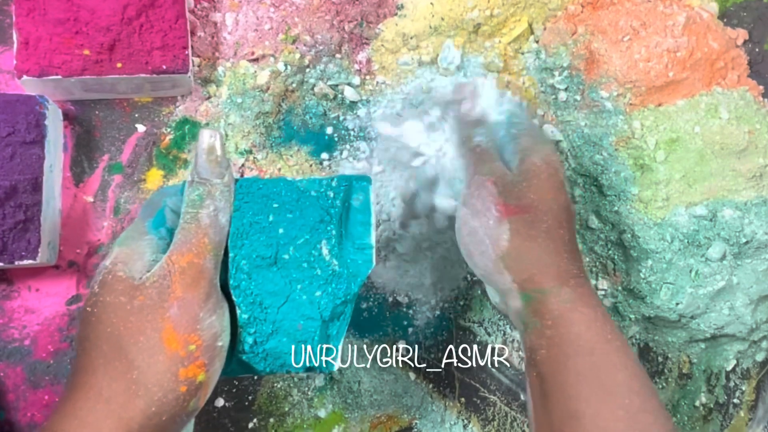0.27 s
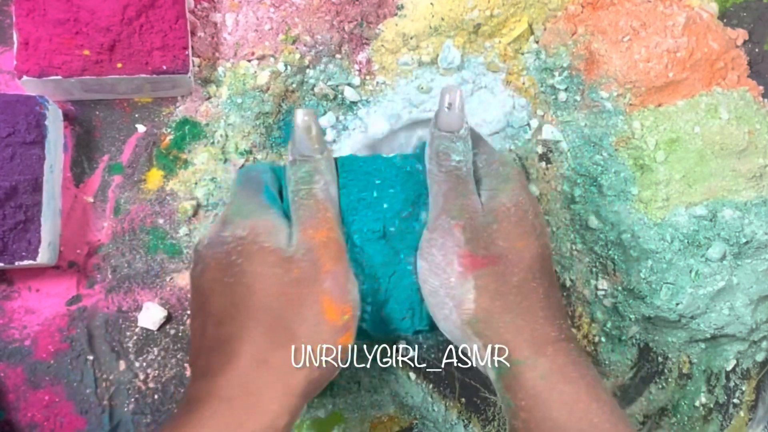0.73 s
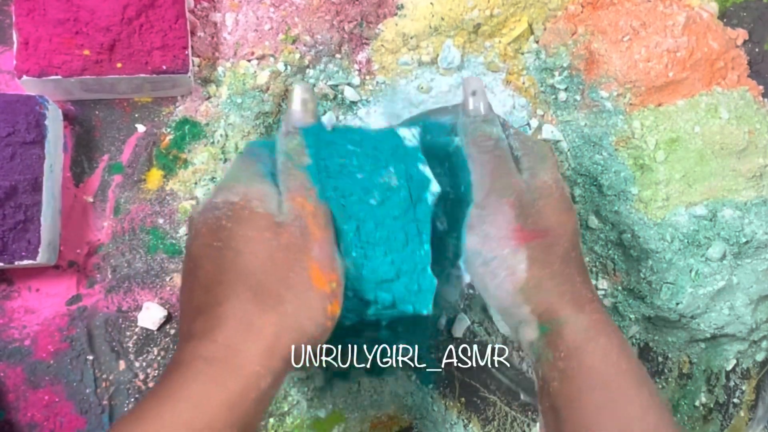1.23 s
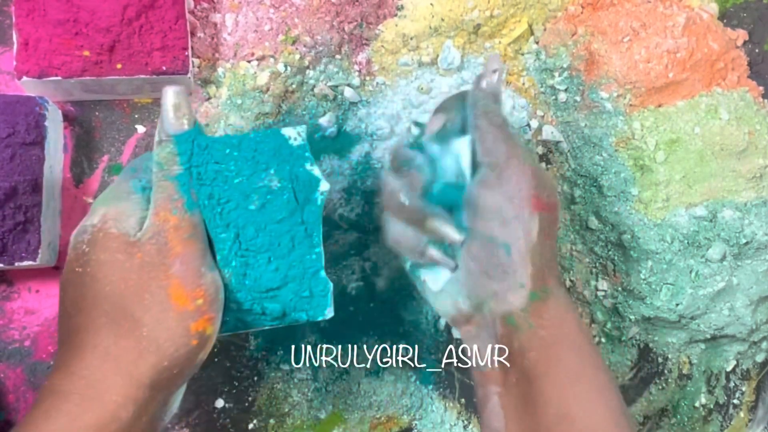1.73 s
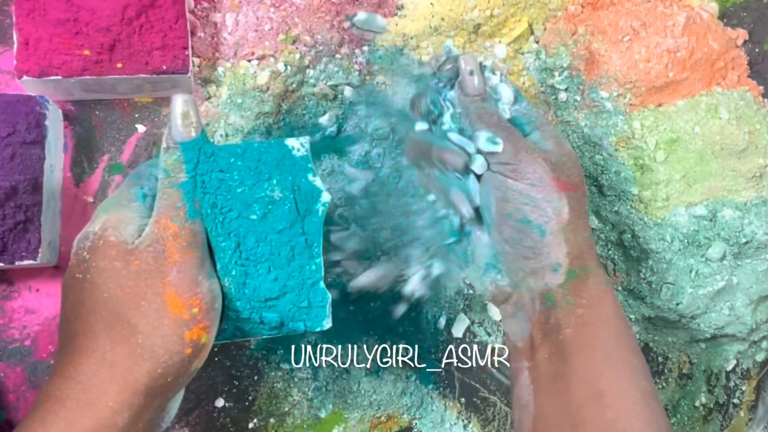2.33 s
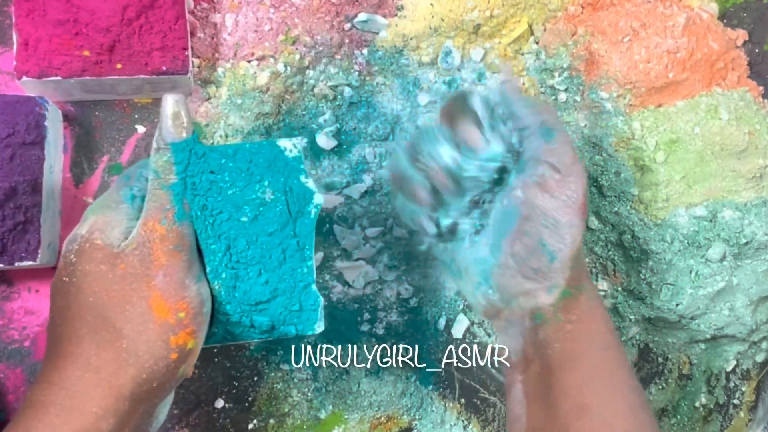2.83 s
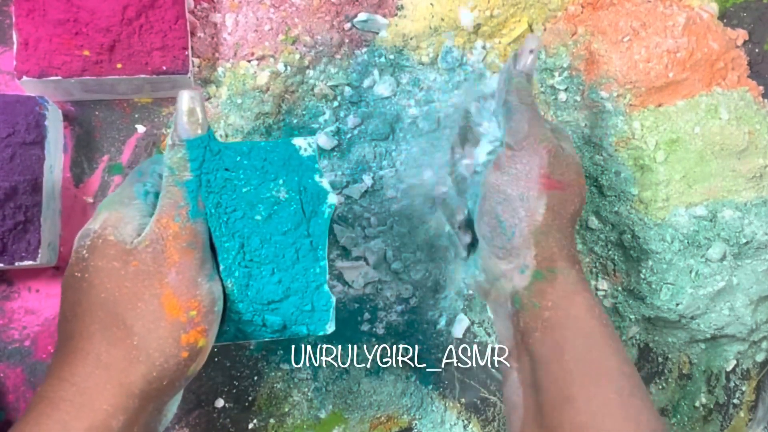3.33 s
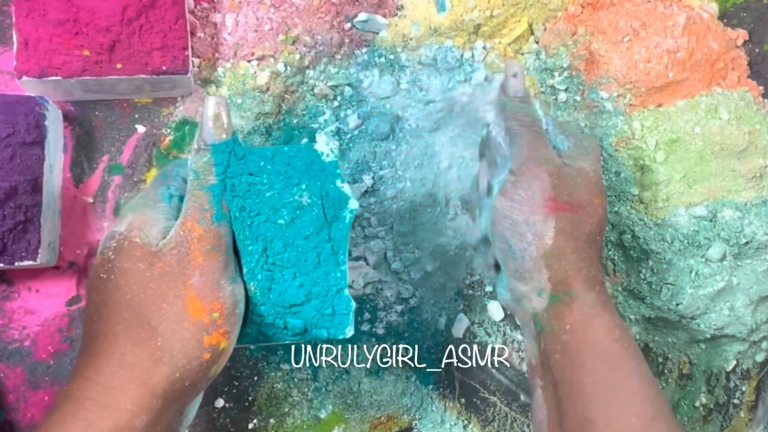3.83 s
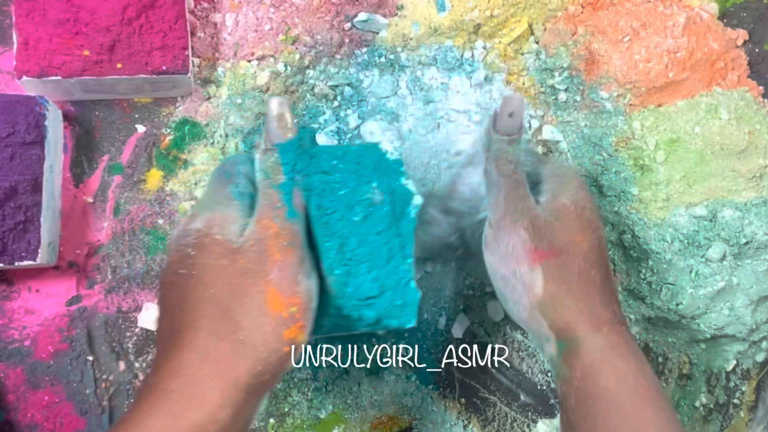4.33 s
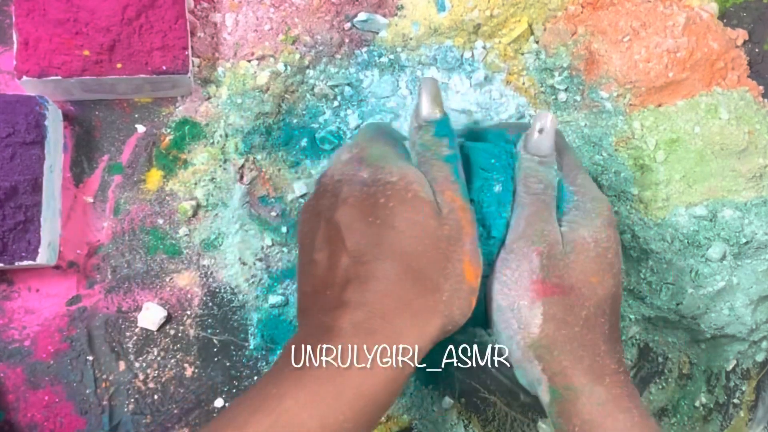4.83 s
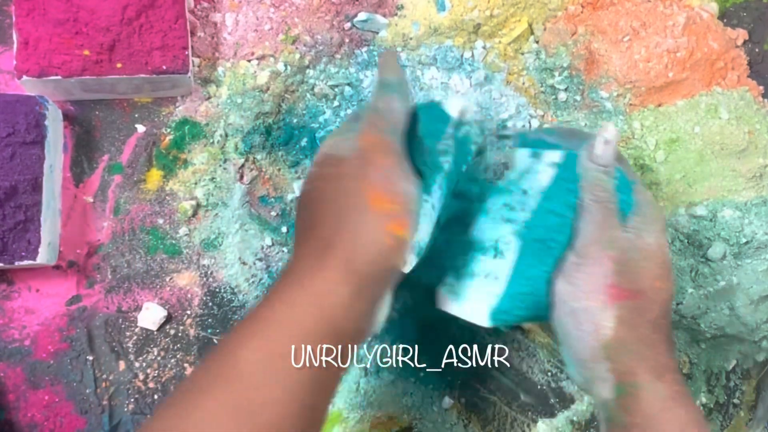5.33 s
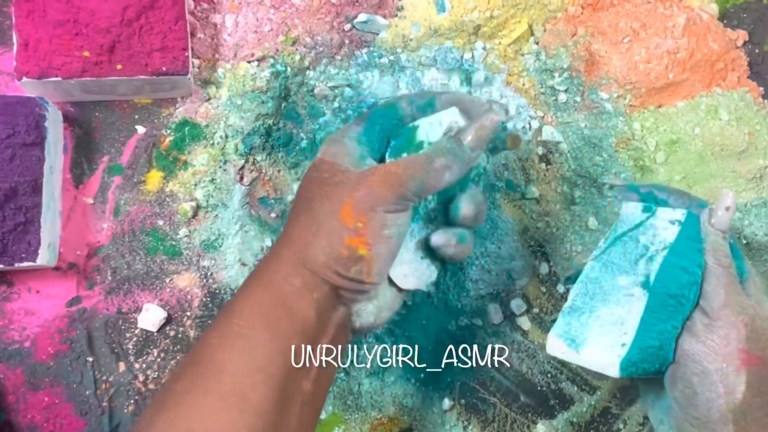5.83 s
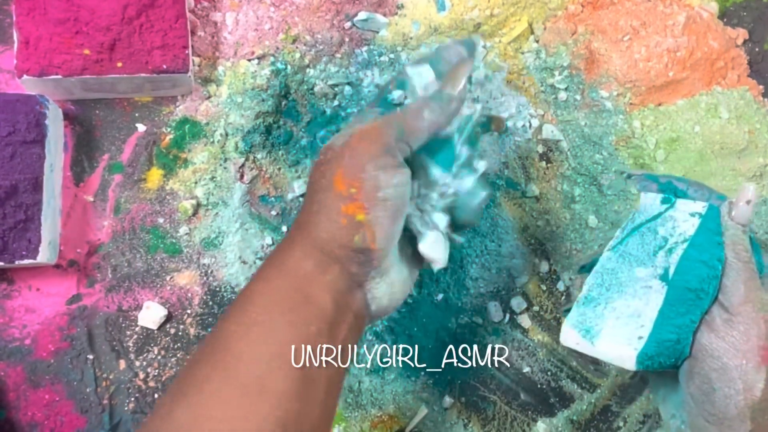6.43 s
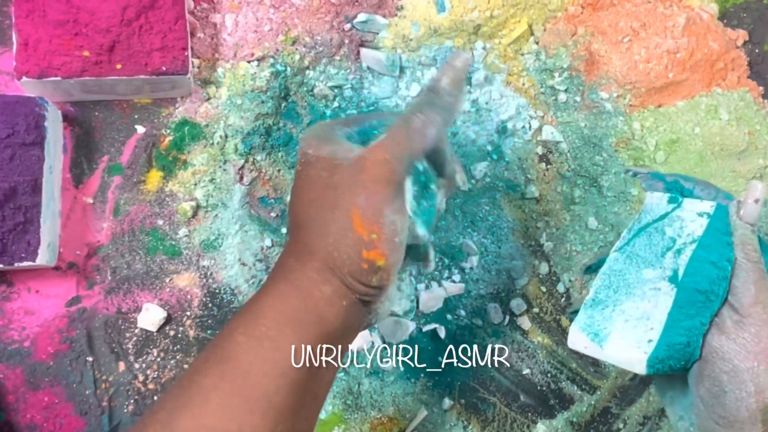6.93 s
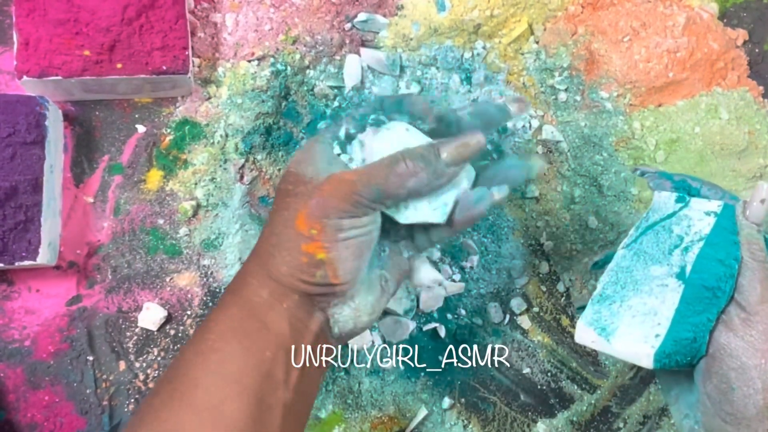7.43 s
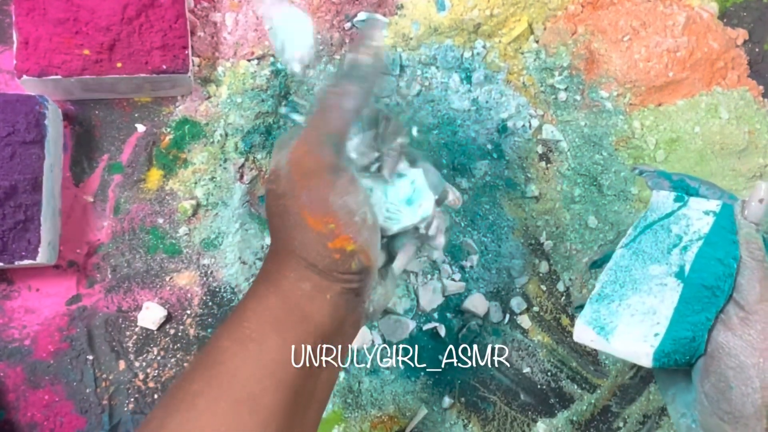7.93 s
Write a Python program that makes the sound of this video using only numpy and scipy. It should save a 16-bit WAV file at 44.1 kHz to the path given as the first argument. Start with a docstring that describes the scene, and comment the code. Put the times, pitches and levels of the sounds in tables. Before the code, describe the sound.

Hands crush blocks of soft chalk up close, with sharp cracks and gritty crumbling over a faint room hum.

```python
"""At a table strewn with powder, hands crush blocks of soft chalk close under a two-port phone microphone.
Each crack is a short avalanche of tiny fractures that sprays splinters, rings a loose chip, knocks in
the block and thuds in the table top. Between the cracks dust and crumbs trickle and chalk faces swish
over each other. Behind it all lies a room rumble with a thin fan hiss and mains hum."""
import sys
import numpy as np
from scipy import signal
from scipy.fft import rfft, irfft, next_fast_len
from scipy.io import wavfile
from scipy.ndimage import uniform_filter1d

SR = 44100
rng = np.random.default_rng(int(sys.argv[2]) if len(sys.argv) > 2 else 0)


def store_wav(level_fs):
    """Save 16-bit WAV to argv[1]."""
    pcm = np.round(np.clip(np.atleast_2d(level_fs), -1, 1) * 32767)
    wavfile.write(sys.argv[1], SR, pcm.T.astype(np.int16))


N = 360738


def undb(db):
    return 10 ** (np.asarray(db, float) / 20)


def curve(rows):
    """Automation lanes: each column after the time, ramped from row to row."""
    times, *columns = np.transpose(rows)
    return [np.interp(np.arange(N) / SR, times, column) for column in columns]


def flicker(rate):
    """Smooth random wobble with rate new values a second; spread near 1."""
    hold = int(SR / rate)
    steps = np.repeat(rng.standard_normal(N // hold + 1), hold)
    return 1.5 * uniform_filter1d(uniform_filter1d(steps, hold), hold)[:N]


def band(x, hz, width):
    """Four-pole band-pass around hz."""
    edges = [hz - width / 2, hz + width / 2]
    return signal.sosfilt(signal.butter(2, edges, "bandpass", fs=SR, output="sos"), x)


def body(x, peaks):
    """Colour x with broad resonances; white noise keeps roughly its level."""
    scale = np.sqrt(sum(undb(2 * db) * width for _, width, db in peaks) / (SR / 2))
    return sum((-1) ** k * undb(db) * band(x, hz, width)
               for k, (hz, width, db) in enumerate(peaks)) / scale


def mode(push, hz, t60):
    """One damped resonance, unity gain for noise."""
    radius = np.exp(-np.log(1000) / (t60 * SR))
    pole = radius * np.exp(2j * np.pi * hz / SR)
    return np.sqrt(2 - 2 * radius ** 2) * signal.lfilter([1], [1, -pole], push).imag


def smear(x, seconds):
    """Give every spike an exponential tail."""
    return signal.lfilter([1], [1, -np.exp(-1 / (seconds * SR))], x)


def grit(spread_db, smear_s):
    """Two noise streams with shared grain sizes: most are tiny, a few stand out; rms 1."""
    size = undb(spread_db * np.minimum(rng.exponential(size=N), 5.5))
    grains = np.sqrt(smear(size ** 2, smear_s)) * rng.standard_normal((2, N))
    return grains / np.sqrt(np.mean(grains ** 2))


# Air-handling rumble bands: f/Hz, width/Hz, level/dB
RUMBLE_BANDS = [(38.2, 4.3, -53.5), (60, 32.4, -48), (68, 23, -51), (119.8, 11.3, -50), (295.6, 22, -67.5)]
# Level of the narrow hiss as the phone's noise suppressor ducks and releases it: t/s, level/dB
HISS_LEVEL = [(0, -72), (1.12, -61), (1.27, -57), (3.7, -53), (4.0, -73), (5.15, -55.5), (5.25, -55),
              (5.75, -65), (6.8, -59.5), (6.9, -75.5), (7.06, -80), (7.12, -56.5), (7.9, -70)]
# Mains hum tones: f/Hz, level/dB
HUM_TONES = [(59.5, -58), (120, -53)]
def room():
    """The bed: low air-handling rumble, a narrow fan hiss and gently wavering mains hum."""
    def air(hz, width, db):
        return undb(db) * np.sqrt(SR / 2 / width) * band(rng.standard_normal((2, N)), hz, width)

    out = sum(air(*row) for row in RUMBLE_BANDS)
    out += air(hz=1540, width=150, db=curve(HISS_LEVEL)[0])
    t = np.arange(N) / SR
    for hz, db in HUM_TONES:
        out[0] += undb(db + 3 * flicker(1.8)) * np.sqrt(2) * np.sin(2 * np.pi * hz * t)
    return out


# Table-top modes: f/Hz, gain/dB, t60/s
TABLE_MODES = [(135.9, -9.5, 0.093), (208, -22, 0.018), (305.7, -16, 0.045), (412, -14, 0.017)]
def table_top(push):
    """The table top answers a push with a few low, damped modes."""
    ring = sum(undb(db) * mode(push, hz, t60) for hz, db, t60 in TABLE_MODES)
    return signal.sosfilt(signal.butter(2, 90, "highpass", fs=SR, output="sos"), ring)


# Sliding strokes: t/s, length/s, level/dB
STROKES = [(0.368, 0.081, -42.5), (2.143, 0.092, -39), (2.314, 0.04, -43), (3.373, 0.048, -44),
           (3.59, 0.15, -42), (3.91, 0.044, -38.5), (4.629, 0.11, -41), (5.308, 0.044, -46),
           (5.452, 0.16, -35.5), (5.624, 0.06, -35), (6.328, 0.22, -45), (7.088, 0.045, -36),
           (7.219, 0.075, -41.5), (7.316, 0.044, -39), (7.612, 0.056, -36), (7.773, 0.033, -26.5)]
# Bright chalk sizzle, shared by strokes and splinters: f/Hz, width/Hz, gain/dB
SIZZLE_BANDS = [(5700, 2450, 5.5), (7480, 670, -2), (9000, 2070, 4.5), (11460, 1120, -13.5)]
# Coarse rasp of rubbing faces: f/Hz, width/Hz, gain/dB
RASP_BANDS = [(2086, 120, 5), (2850, 970, -4.5), (1420, 520, -3.5)]
def swishes():
    """Chalk faces and fingers slide over each other: a soft swell with a slower release."""
    power = np.zeros(N)
    for at, length, db in STROKES:
        progress = np.linspace(0, 1, int(length * SR))
        start = int(at * SR)
        power[start:start + len(progress)] += undb(2 * db) * np.sin(np.pi * progress ** 0.77) ** 2
    friction = grit(spread_db=4, smear_s=0.00061) * np.sqrt(power)
    return body(friction, SIZZLE_BANDS) + undb(-13.5) * body(friction, RASP_BANDS)


def landings(per_second=70, spread_db=5):
    """Single crumbs land on the heap, each a short dry tick."""
    hits = (rng.random(N) < per_second / SR) * undb(spread_db * rng.standard_normal(N))
    return smear(hits, 0.0055) * rng.standard_normal((2, N))


# The hand working the chalk: t/s, dust level/dB, crumb level/dB, pressure level/dB
HANDWORK = [(0.0, -32.5, -30, -21), (.17, -51.5, -57.5, -45), (.57, -50.5, -44.5, -37),
            (.78, -54, -51.5, -45), (1.0, -64, -67, -48), (1.2, -52, -54, -36), (1.8, -49, -53, -45.5),
            (2.15, -52.5, -55, -56), (2.38, -41, -47.5, -61.5), (2.62, -47.5, -49.5, -35.5),
            (2.9, -51, -54, -43), (3.08, -42, -49.5, -42.5), (3.35, -57.5, -58, -41),
            (3.72, -43, -46.5, -43.5), (3.97, -52.5, -59, -51.5), (4.44, -51, -50, -39),
            (4.75, -53.5, -58.5, -48.5), (4.92, -55, -56.5, -37), (5.0, -59.5, -57, -39),
            (5.44, -55.5, -68.5, -43), (6.17, -49, -52.5, -56), (6.29, -59.5, -58, -65),
            (6.4, -51, -60, -55), (6.67, -39, -44, -33.5), (6.88, -57.5, -61, -45),
            (7.01, -58.5, -75.5, -63), (7.06, -47.5, -61, -48), (7.24, -47.5, -58.5, -45),
            (7.7, -44, -54, -41.5), (7.96, -57, -71, -61), (8.18, -46, -55, -31.5)]
# Hiss of fine dust: f/Hz, width/Hz, gain/dB
DUST_BANDS = [(3920, 2540, 3), (7350, 4300, 1), (9250, 3800, 2.5), (12000, 1200, -8)]
# Crunch of coarse crumbs: f/Hz, width/Hz, gain/dB
CRUMB_BANDS = [(688, 770, 4.5), (950, 400, 8), (1320, 286, 12.5), (2540, 1470, 5.5)]
def crumble():
    """Dust hisses, crumbs crunch and tick, faces swish and the pressing hand shakes the table."""
    dust_db, crumb_db, press_db = curve(HANDWORK)
    dust = grit(spread_db=3, smear_s=0.004) * undb(dust_db + 2.5 * flicker(45) + 0.5 * flicker(8))
    crumbs = grit(spread_db=7, smear_s=0.00081) * undb(crumb_db + 3.5 * flicker(35) + 1.3 * flicker(6.3))
    strokes = swishes()
    ticks = landings()
    hiss = body(dust + ticks * undb(dust_db - 6), DUST_BANDS)
    crunch = body(crumbs + ticks * undb(crumb_db), CRUMB_BANDS)
    pressure = rng.standard_normal((2, N)) * undb(press_db + 2 * flicker(21))
    return hiss + crunch + strokes + table_top(pressure)


def avalanche(times, levels_db, decays, tail_db, tail_t60, rise_s=0.0006):
    """Envelope of a row of breaks: strain creaks up, the break hits, a fainter tail crumbles on."""
    lead = SR // 20
    t = np.arange(-lead, SR // 4) / SR
    strain = undb(2 * -25) * np.exp(-2 * np.abs(t) / 0.003)  # 25 dB under the break, grows in 3 ms
    attack = np.clip(t / rise_s, 0, 1) ** 2
    after_peak = np.maximum(t - rise_s, 0)
    power = np.zeros(N + SR)
    for at, db, t60 in zip(times, levels_db, decays):
        release = undb(-120 * after_peak / t60) + undb(2 * tail_db - 120 * after_peak / tail_t60)
        start = int(at * SR)
        power[start:start + len(t)] += undb(2 * db) * (strain + attack * release)
    return np.sqrt(power[lead:N + lead])


def blows(times, levels_db, contact_s):
    """One push and rebound per blow; a shorter contact sounds brighter."""
    out = np.zeros(N + SR)
    for at, db, contact in np.broadcast(times, levels_db, contact_s):
        push = np.diff(np.hanning(int(contact * SR)))
        start = int(at * SR)
        out[start:start + len(push)] += undb(db) * push / np.sqrt(np.mean(push ** 2))
    return out[:N]


# Block, lump or fist coming down on the table: t/s, level/dB, t60/s, contact/s
THUD_CUES = [(0.495, -23, 0.18, 0.0022), (0.557, -22.5, 0.21, 0.0019), (1.047, -20, .06, 0.0047),
             (2.297, -29.5, 0.85, 0.0032), (2.331, -34, 0.19, 0.0052), (2.36, -25.5, 0.19, 0.0047),
             (2.389, -28.5, 0.16, 0.0056), (2.419, -39.5, 0.18, 0.0044), (2.691, -38.5, 0.089, 0.0039),
             (3.052, -38, 0.27, 0.013), (4.095, -36.5, 0.26, 0.0042), (4.493, -22.5, 0.13, 0.0012),
             (5.042, -6, 0.12, 0.0022), (6.183, -39.5, 0.25, 0.0013), (6.429, -31.5, 0.19, 0.0011),
             (6.624, -21.5, 0.17, 0.0031), (8.016, -34, 0.31, 0.0025), (8.097, -36, 0.099, 0.00071),
             (8.141, -43, .08, 0.0029)]
def thuds(fractures, crack_times, knock_db, crack_t60):
    """The table thuds under each blow and each crack; a harder knock shakes it more."""
    shake_db = -45.5 + 0.53 * (knock_db + 30)
    shakes = [crack_times, shake_db, 5.2 * crack_t60, np.full_like(crack_times, 0.0022)]
    times, db, t60, contact_s = np.hstack([shakes, np.transpose(THUD_CUES)])
    push = fractures * avalanche(times, db, t60, tail_db=-3, tail_t60=0.18)
    push[0] += blows(times, db - 5.5, contact_s)
    return table_top(push)


def chips(shatter, times, knock_db, pitches, decays):
    """Each freed chip rings, rattled by the shatter and struck once; bigger, lower chips ring louder."""
    out, length = np.zeros((2, N + SR)), SR // 16
    t = np.arange(length) / SR
    for at, db, hz, t60 in zip(times, knock_db, pitches, decays):
        start = int(at * SR)
        rattle = shatter[:, start:start + length]
        gate = t[:rattle.shape[1]] < t60 / 3
        out[:, start:start + len(gate)] += mode(rattle * gate, hz, t60=0.022)
        ring_t60 = 17 / np.sqrt(1000 * hz)  # 17 cycles at 1 kHz, fewer for lower chips
        strike = undb(db + 2.5 - 60 * t / ring_t60) * np.sqrt(1000 / hz)
        phase = 2 * np.pi * hz * t
        overtone = undb(-10.5) * np.sin(2.25 * phase)
        out[0, start:start + length] += strike * (np.sin(phase) + overtone)
    return undb(-6.5) * out[:, :N]


# Cracks and dropped lumps: t/s, shard level/dB, knock level/dB, splinter level/dB, chip f/Hz, t60/s
CRACK_CUES = [(0.018, -28, -49, -23, 860, 0.035), (0.072, -62, -26, -60.5, 804, 0.13),
              (0.247, -47, -26, -58, 740, 0.087), (0.333, -20.5, -23.5, -27.5, 870, 0.035),
              (0.457, -42, -40, -37, 794, 0.035), (0.481, -24, -16, -53, 970, 0.032),
              (0.496, -20.5, -13, -29.5, 1000, 0.039), (0.507, -42, -25, -52, 594, 0.033),
              (0.559, -32, -12.5, -49, 930, 0.078), (0.611, -55, -46, -21, 6500, 0.041),
              (0.683, -25, -15.5, -37, 760, 0.058), (0.728, -45, -32.5, -50, 744, 0.12),
              (0.83, -49, -66, -39.5, 6740, 0.077), (1.035, -54, -30, -29, 1200, 0.032),
              (1.046, -21.5, -9, -17, 1570, 0.074), (1.0485, -34, -11.5, -40, 310, 0.027),
              (1.108, -27, -29, -22.5, 2750, 0.036), (1.095, -23.5, -20.5, -23.5, 1770, 0.07),
              (1.254, -36.5, -27, -63.5, 740, 0.013), (1.286, -42, -42, -41, 3100, 0.03),
              (1.43, -45, -33, -61, 750, 0.04), (1.53, -33, -25.5, -42, 1020, 0.013),
              (1.539, -31, -25, -34, 2110, 0.025), (1.555, -19.5, -10, -20.5, 1480, 0.039),
              (1.594, -28, -37, -27, 1470, 0.049), (1.61, -28.5, -22, -24.5, 2130, 0.081),
              (1.696, -33, -36, -29, 5300, 0.062), (1.711, -16.5, -18.5, -23, 2080, 0.081),
              (1.724, -28, -16.5, -20, 780, 0.085), (1.732, -10.5, -9, -7.5, 1900, 0.035),
              (1.798, -37.5, -29.5, -27.5, 1520, 0.045), (1.892, -42, -44, -38.5, 4070, 0.47),
              (1.946, -6, -18, -9.5, 5970, 0.038), (1.976, -41, -26, -17, 4700, 0.024),
              (2.078, -21.5, -21, -27, 1270, 0.06), (2.2782, -27.5, -30, -47.5, 1000, 0.031),
              (2.297, -38, -22.5, -43, 770, 0.24), (2.32, -34, -29, -48, 2290, 0.068),
              (2.333, -32, -24.5, -35, 2150, 0.049), (2.362, -30, -40, -33.5, 750, 0.073),
              (2.392, -31, -23.5, -29.5, 770, 0.054), (2.419, -36, -26, -35, 1010, 0.19),
              (2.511, -31, -24, -22.0, 737, 0.038), (2.534, -34, -28.5, -39, 2280, 0.07),
              (2.571, -28, -25, -26.5, 4300, 0.061), (2.64, -42, -31.5, -39.5, 920, 0.1),
              (2.694, -39, -38, -36, 710, 0.036), (2.726, -32.5, -32, -36, 900, 0.047),
              (2.769, -47, -31.5, -41, 780, 0.042), (2.837, -46, -32.5, -40, 1330, 0.062),
              (2.892, -39, -49, -41, 4260, 0.043), (2.964, -40.5, -31.5, -38.5, 1220, 0.27),
              (3.016, -35.5, -31.5, -33, 1520, 0.079), (3.037, -35, -26, -34, 1340, 0.022),
              (3.058, -37, -33, -25, 5800, 0.034), (3.182, -39, -44, -33, 2000, 0.13),
              (3.204, -38, -33, -29.5, 7500, 0.2), (3.237, -40, -30.5, -29, 5640, 0.059),
              (3.686, -40, -36, -38, 1270, 0.11), (3.717, -26.5, -36, -28.5, 3700, 0.049),
              (3.823, -34, -33.5, -29, 6120, 0.082), (4.095, -40, -31.5, -45.5, 910, 0.3),
              (4.217, -50, -32.5, -38, 755, 0.1), (4.238, -41, -33.5, -41, 754, 0.21),
              (4.361, -27.5, -25, -34.5, 960, 0.047), (4.408, -38, -32.5, -43.5, 750, 0.063),
              (4.468, -31, -23.5, -65, 980, 0.033), (4.492, -32, -13, -57, 880, 0.06),
              (4.848, -45, -39, -40.5, 840, 0.064), (5.017, -74, -66, -32.5, 7740, 0.041),
              (5.0416, -21.5, -7.5, -16.5, 411, 0.079), (5.637, -54, -67, -36, 7100, 0.19),
              (5.699, -37.5, -42, -32.5, 8700, 0.09), (5.916, -19, -14, -13, 1825, 0.078),
              (5.933, -26.5, -25.5, -28, 1310, 0.16), (5.978, -23, -26.5, -17, 5250, 0.03),
              (5.991, -12.5, -7.5, -12, 2240, 0.014), (6.112, -33.5, -35, -33.5, 1740, 0.065),
              (6.183, -42, -39, -35, 744, 0.066), (6.199, -48, -37, -38.5, 604, 0.13),
              (6.262, -42, -31, -60.5, 900, 0.028), (6.319, -49, -42.5, -35.5, 9300, 0.14),
              (6.483, -45.5, -51, -37, 1550, 0.046), (6.524, -38.5, -33.5, -59.5, 1600, 0.04),
              (6.548, -51.5, -49, -36.5, 5850, 0.36), (6.604, -33, -35, -32, 2250, 0.077),
              (6.625, -46, -29.5, -29, 540, 0.14), (6.693, -37, -36.5, -35.5, 895, 0.034),
              (6.726, -29.5, -31.5, -35.5, 730, 0.022), (6.745, -40, -28, -38.5, 910, 0.095),
              (6.763, -35.5, -37, -28, 3280, 0.036), (6.818, -35, -35.5, -27, 3070, 0.054),
              (7.405, -24.5, -22.5, -30, 840, 0.041), (7.467, -17.5, -22, -17, 3200, 0.033),
              (7.498, -34.0, -32, -27.5, 5340, 0.065), (7.518, -28, -27, -22, 8200, 0.029),
              (7.562, -40, -22.5, -40, 960, 0.033), (7.736, -37, -36, -50, 2380, 0.022),
              (7.76, -25, -20.5, -26, 373, 0.099), (7.804, -33, -27.5, -34, 1300, 0.075),
              (7.823, -27.5, -21, -18.5, 2600, 0.028), (7.832, -36, -25, -31, 1300, 0.11),
              (7.865, -36, -28, -32, 1300, 0.1), (7.893, -23, -23, -20.5, 1390, 0.044),
              (8.011, -46, -27, -34, 1500, 0.073), (8.018, -46, -39, -42.5, 950, 0.92),
              (8.071, -35.5, -33, -22.5, 8300, 0.076), (8.095, -41, -17, -31.5, 1290, 0.029),
              (8.097, -50, -21, -46, 408, 0.0056), (8.14, -35.5, -25.5, -35.5, 420, 0.05)]
# Bite of the shards: f/Hz, width/Hz, gain/dB
SHARD_BANDS = [(2106, 330, 8.5), (3110, 1370, 10)]
# Knock of the block: f/Hz, width/Hz, gain/dB
BLOCK_BANDS = [(572, 386, 7.5), (784, 758, 12), (1108, 65, 9.5), (1508, 396, 12)]
def cracks():
    """The chalk breaks: the same fractures drive splinters, shards, chips, the block and the table."""
    times, shard_db, knock_db, splinter_db, chip_hz, t60 = np.transpose(CRACK_CUES)
    fractures = grit(spread_db=3.2, smear_s=0.0003)
    # a slower attack: splinters fly a moment after the break
    splinters = fractures * avalanche(times, splinter_db, t60, tail_db=-20, tail_t60=0.17, rise_s=0.0021)
    shatter = fractures * avalanche(times, shard_db, t60, tail_db=-22.5, tail_t60=0.22)
    knock = fractures * avalanche(times, knock_db, 0.47 * t60, tail_db=-19, tail_t60=0.2)
    ring = chips(shatter, times, knock_db, chip_hz, t60)
    snap_db, snap_s = -4, 0.00029  # the first fracture puts a click on the attack
    knock[0] += blows(times, knock_db + snap_db, snap_s)
    shatter[0] += blows(times, shard_db + snap_db, snap_s / 2)
    chalk = body(splinters, SIZZLE_BANDS) + body(shatter, SHARD_BANDS) + body(knock, BLOCK_BANDS)
    return chalk + ring + thuds(fractures, times, knock_db, t60)


# Tone of both ports, with their resonance and the roll-off above it: f/Hz, gain/dB
PORT_EQ = [(20, -14), (45, 0), (8500, 0), (10400, 5), (11000, 3), (12200, -5), (13200, -10), (15000, -10)]
# Right port against left: f/Hz, level/dB, likeness/0-1
RIGHT_PORT = [(60, -1, .97), (200, -2, .95), (380, -4.5, .8), (700, -2.5, .65), (1400, -2.5, .35),
              (2600, -1.5, .65), (4000, -4, .5), (5700, -10, .4), (7800, -6, .4), (9000, -.4, .98),
              (15000, -.4, .93)]
def microphone(streams):
    """Left hears the first stream; right hears it shaded, blended with the second as scattered sound."""
    size = next_fast_len(N + 4096)
    hz = np.arange(size // 2 + 1) * SR / size

    def over_frequency(rows):
        points, *columns = np.transpose(rows)
        return [np.interp(np.log(hz + 1), np.log(points), column) for column in columns]

    right_db, likeness = over_frequency(RIGHT_PORT)
    direct, scattered = undb(over_frequency(PORT_EQ)[0]) * rfft(streams, size)
    # right is late below, early in the treble, in step at the very top
    lag_s = np.where(hz < 8300, 1.3e-4, -2.5e-4) * (hz < 13000)
    shifted = direct * np.exp(-2j * np.pi * hz * lag_s)
    right = undb(right_db) * (likeness * shifted + np.sqrt(1 - likeness ** 2) * scattered)
    return irfft(np.array([direct, right]), size)[:, :N]


def scene():
    """Cracks and crumbling over the room bed, close up in stereo."""
    return microphone(cracks() + crumble() + room())


def record(dry):
    """Peaks clip at full scale, then a steep low-pass cuts the top."""
    top_cut = signal.ellip(8, .2, 70, 15640, fs=SR, output="sos")
    return signal.sosfilt(top_cut, np.clip(dry, -1, 1))


dry = scene()
out = record(dry)
store_wav(out)
```